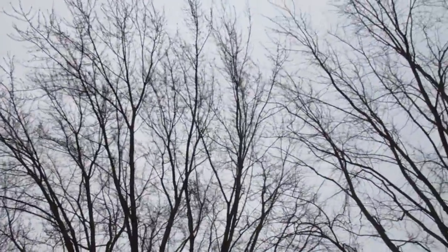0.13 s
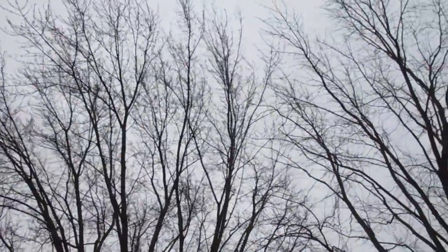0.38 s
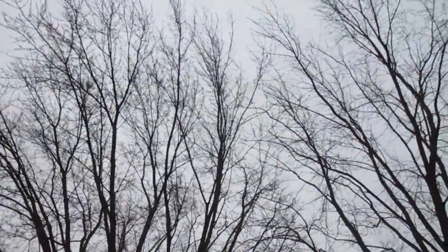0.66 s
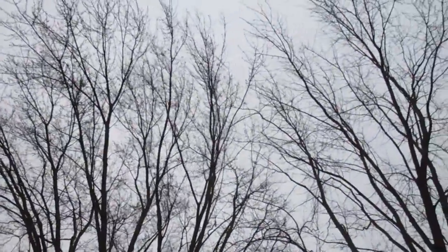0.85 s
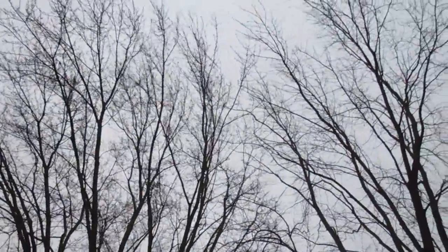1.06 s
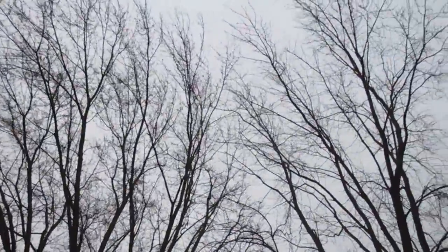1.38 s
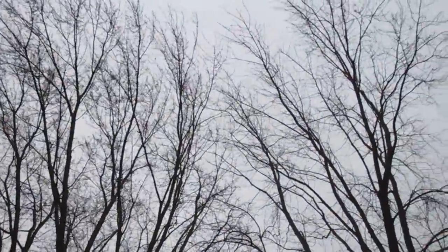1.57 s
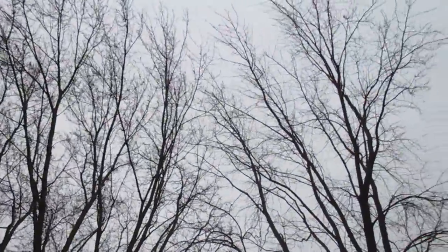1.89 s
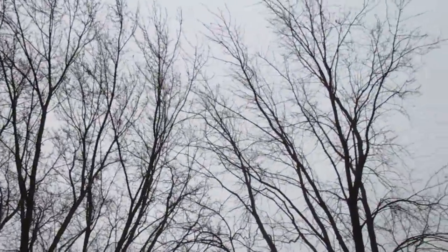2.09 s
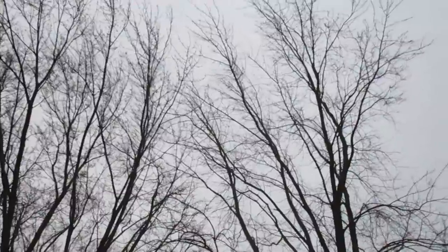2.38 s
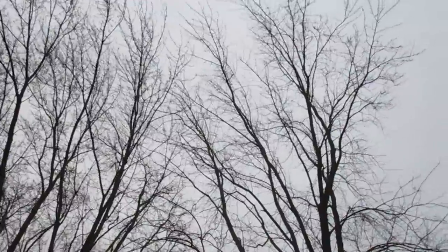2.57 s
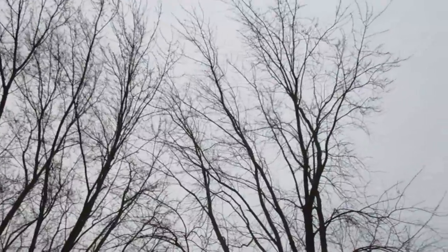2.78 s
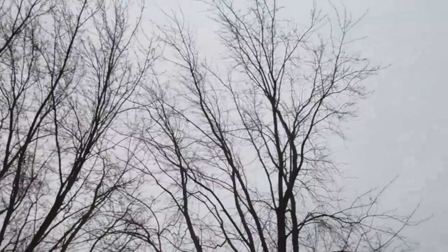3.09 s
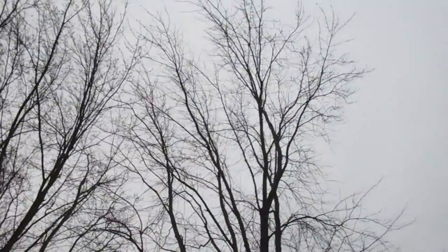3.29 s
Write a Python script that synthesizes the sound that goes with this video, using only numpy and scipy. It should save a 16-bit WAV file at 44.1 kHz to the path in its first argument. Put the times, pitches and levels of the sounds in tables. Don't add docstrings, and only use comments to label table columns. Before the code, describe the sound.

Wind in bare trees outdoors: a dominant low roar with a thin, much quieter twig hiss. It starts subdued, swells from about 0.5 to 2 seconds, peaks near 2.4 and holds strong to the end at 3.4. Low thumps buffet the small mono microphone, densest between 2 and 2.7 seconds. Tiny twig ticks occur near 0.05, 0.45 and 1.05 seconds, the clearest at 2.34.

```python
import sys
import numpy as np
from scipy import signal
from scipy.fft import rfft, irfft, next_fast_len
from scipy.io import wavfile
from scipy.ndimage import uniform_filter1d, map_coordinates

SR = 44100
rng = np.random.default_rng(int(sys.argv[2]) if len(sys.argv) > 2 else 0)


def wrap_up_sound(samples):
    columns = np.atleast_2d(samples).T
    tamed = np.clip(columns, -1, 1)
    steps = np.round(tamed * 32767).astype(np.int16)
    wavfile.write(sys.argv[1], SR, steps)


def invert_db(x):
    u = np.asarray(x, float) / 20
    return 10 ** u


N = 152145

# time in seconds, wind strength in dB.
WIND_DB = [
    (0.0, -46.5),
    (.45, -44.5),
    (.95, -41.5),
    (1.45, -38.5),
    (1.95, -37.5),
    (2.36, -36),
    (2.7, -36.5),
    (3.45, -36.5),
]
# frequency in Hz, density in dB per Hz.
ROAR_SPECTRUM = [(15, -29), (30, -7), (60, -7), (150, -0.5), (260, -0.5), (420, -8.5), (620, -17.5),
                 (1600, -72)]
# frequency in Hz, density in dB per Hz.
HISS_SPECTRUM = [(500, -34), (900, -4), (1500, -1), (2500, -5.5), (4000, -13.5), (7000, -19), (11000, -26),
                 (15700, -41.5)]
# frequency in Hz, density in dB per Hz.
RUMBLE_SPECTRUM = [(12, -30), (30, -10), (90, -6.5), (160, -12.5), (300, -53), (600, -83)]
# time in seconds, level over the wind in dB, length in seconds,
# pitch in Hz.
EDDIES = [(0.642, 17, 0.018, 155), (0.87, 11, 0.05, 265), (1.611, 17.5, 0.017, 255),
          (2.916, 12, 0.043, 255), (3.196, 9.5, 0.043, 250), (3.357, 14.5, 0.032, 140),
          (1.316, 18.5, 0.037, 140), (1.546, 14, 0.025, 60.3), (2.016, 20.5, 0.014, 90),
          (2.05, 16, 0.025, 55.7), (2.19, 16.5, 0.027, 105.6), (2.248, 17.5, 0.037, 140),
          (2.284, 20, 0.039, 80), (2.26, 14.5, .08, 39.9), (2.356, 16.5, 0.067, 58.5),
          (2.468, 29.5, 0.0073, 97.8), (2.542, 17.5, 0.026, 238.2), (2.662, 16, 0.031, 132.6),
          (3.273, 15, 0.047, 74.2)]
# start in seconds, peak in dB, pitch in Hz, 60 dB decay time in seconds.
TICKS = [(.052, -49, 9000, 0.013), (.066, -46, 6500, .012), (.162, -62, 14000, .02), (.455, -40, 3600, .02),
         (.568, -50, 9500, .03), (1.055, -45, 4500, .015), (1.064, -54, 12500, 0.013),
         (2.302, -48, 10500, .012), (2.321, -55.5, 10000, .015), (2.339, -30, 4020, .07),
         (2.342, -41, 8500, .04), (2.344, -35.5, 5870, 0.037), (2.347, -50, 13800, .012),
         (3.395, -48, 13500, .015)]
# centre in Hz, width in Hz, depth from 0 to 1.
HOUSING_DIPS = [(853, 110, 0.12), (3050, 420, 0.43), (4823, 1400, 1)]
# frequency in Hz, density in dB per Hz.
SELF_NOISE_SPECTRUM = [(2000, -20), (7000, 0), (12000, -3), (15700, -14)]

SELF_NOISE_DB = -71
TICK_WIDTH_OVER_PITCH, TICK_RISE_S = 0.26, 0.0022
RUMBLE_OVER_WIND_DB, RUMBLE_DB_PER_GUST_DB = 4, 1.44
ROAR_OVER_HISS_DB, ROAR_DB_PER_GUST_DB = 14.5, 0.97
FINE_DB_PER_GUST_DB, FINE_ABOVE_HZ = 0.23, 4130
DEEPEST_DIP = 0.86


def unit(x):
    return x / np.sqrt(np.mean(x ** 2) + 1e-20)


def along(points, hz):
    point_hz, value = np.transpose(points)
    return np.interp(np.log(hz + 1), np.log(point_hz + 1), value)


def wobble(knots_per_s):
    return map_coordinates(rng.standard_normal(200), [np.arange(N) * knots_per_s / SR])


def filtered(x, response):
    size = next_fast_len(N + SR // 2)
    return irfft(rfft(x, size) * response(np.fft.rfftfreq(size, 1 / SR)), size)[..., :N]


def rush(spectrum, patchy_db):
    z = signal.stft(rng.standard_normal(N), nperseg=512)[2]
    patches = uniform_filter1d(rng.standard_normal(z.shape), size=8, axis=0)
    patches = uniform_filter1d(patches, size=12, axis=1)
    x = signal.istft(z * invert_db(patchy_db * unit(patches)), nperseg=512)[1][:N]
    return unit(filtered(x, lambda hz: invert_db(along(spectrum, hz))))


def resonance(hz, centre_hz, width_hz):
    damping = 1j * hz * width_hz
    return damping / (centre_hz * centre_hz - hz * hz + damping)


def wind_strength():
    time_s, db = np.transpose(WIND_DB)
    level_db = np.interp(np.arange(N) / SR, time_s, db)
    return level_db.mean(), level_db - level_db.mean()


def self_noise():
    return invert_db(SELF_NOISE_DB) * rush(SELF_NOISE_SPECTRUM, patchy_db=0.1)


def twig_ticks():
    out, t = np.zeros(N), np.arange(SR // 20) / SR
    for start_s, peak_db, hz, t60_s in TICKS:
        envelope = invert_db(-60 * t / t60_s) * (1 - np.exp(-t / TICK_RISE_S))
        burst = np.zeros(N + SR)
        burst[round(start_s * SR):][:len(t)] = envelope * rng.standard_normal(len(t))
        width_hz = TICK_WIDTH_OVER_PITCH * hz
        burst = filtered(burst[:N], lambda f: resonance(f, hz, width_hz) ** 2)
        out += invert_db(peak_db) * burst / np.abs(burst).max()
    return out


def port_buffeting():
    mean_db, gust_db = wind_strength()
    t = np.arange(N) / SR
    rumble_db = RUMBLE_OVER_WIND_DB + RUMBLE_DB_PER_GUST_DB * gust_db + 1.0 * wobble(8.4)
    rumble = invert_db(rumble_db) * rush(RUMBLE_SPECTRUM, patchy_db=0.1)
    thumps = np.zeros(N)
    for time_s, db, length_s, hz in EDDIES:
        pulse = np.exp(-((t - time_s) / length_s) ** 2)
        thumps += invert_db(db) * pulse * np.sin(2 * np.pi * (hz * t + rng.random()))
    return invert_db(mean_db) * (rumble + invert_db(gust_db) * thumps)


def trees():
    mean_db, gust_db = wind_strength()
    roar_db = ROAR_OVER_HISS_DB + ROAR_DB_PER_GUST_DB * gust_db + 0.25 * wobble(3.48)
    roar = invert_db(roar_db) * rush(ROAR_SPECTRUM, patchy_db=0.79)
    hiss = rush(HISS_SPECTRUM, patchy_db=0.3)
    fine = filtered(hiss, lambda hz: hz ** 4 / (hz ** 4 + FINE_ABOVE_HZ ** 4))
    fine_db = FINE_DB_PER_GUST_DB * gust_db + 0.29 * wobble(11.17) + 0.4 * wobble(25.54)
    hiss = hiss - fine + fine * invert_db(fine_db)
    return invert_db(mean_db) * (roar + invert_db(gust_db) * hiss)


def scene():
    return (twig_ticks() + port_buffeting() + trees())[None]


def housing(hz):
    response = 1
    for centre_hz, width_hz, depth in HOUSING_DIPS:
        response = response * (1 - min(depth, DEEPEST_DIP) * resonance(hz, centre_hz, width_hz))
    return response


def band_limit(x):
    return signal.sosfilt(signal.butter(12, 15700, fs=SR, output="sos"), x)


def record(dry):
    mix = filtered(dry, housing) + self_noise()
    return band_limit(mix)


dry = scene()
out = record(dry)
wrap_up_sound(out)
```